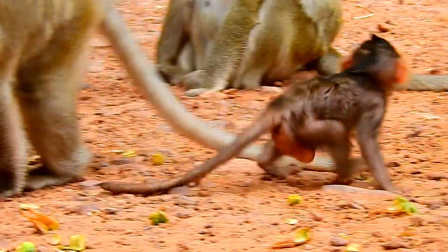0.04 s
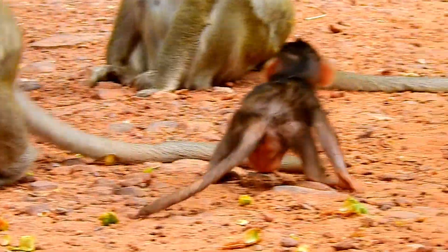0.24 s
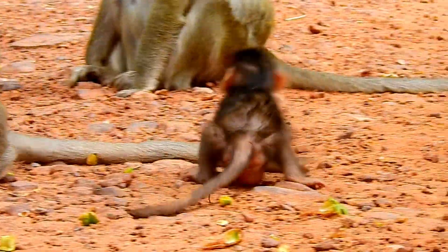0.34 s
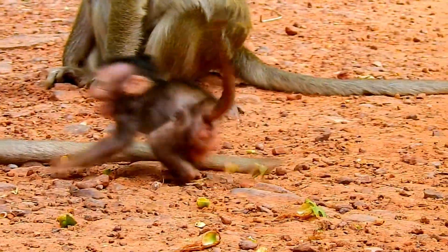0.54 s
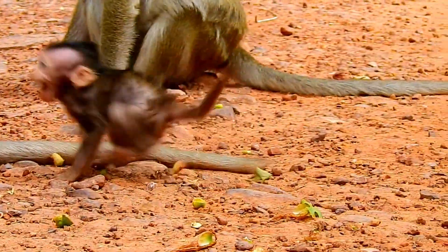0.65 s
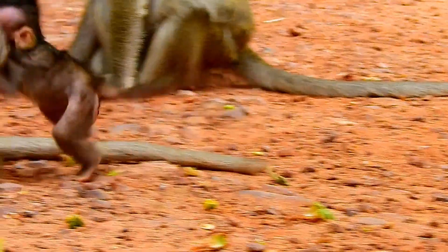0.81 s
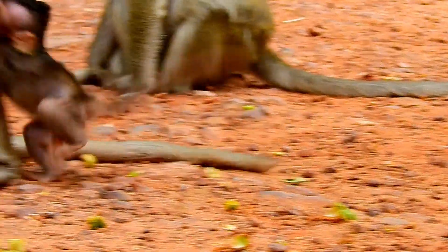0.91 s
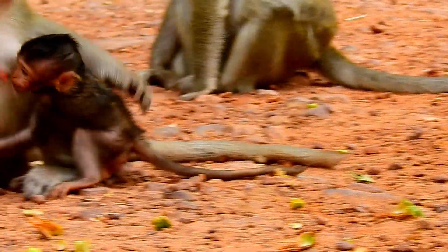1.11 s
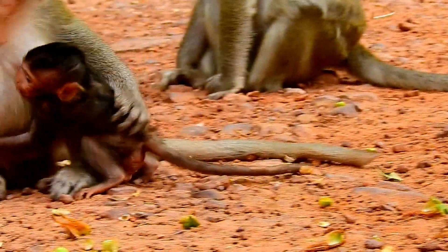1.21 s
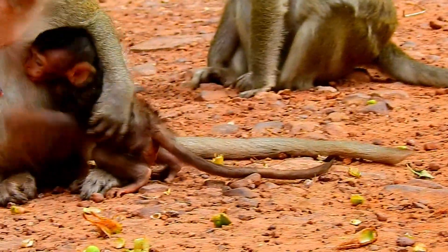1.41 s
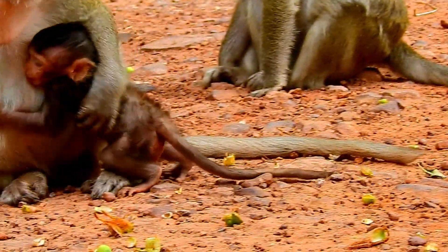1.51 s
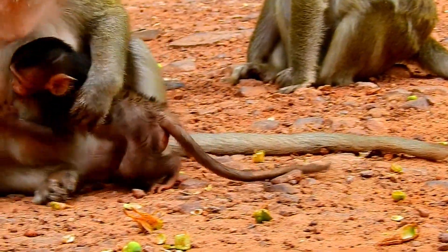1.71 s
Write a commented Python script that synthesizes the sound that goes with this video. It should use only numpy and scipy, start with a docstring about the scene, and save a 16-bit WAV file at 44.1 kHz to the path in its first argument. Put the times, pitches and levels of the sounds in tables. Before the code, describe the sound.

A baby monkey cries outdoors. An earlier cry's echo fades at the start, then a hoarse, ragged cry runs from about 0.2 to 0.5 seconds. A very high squeal follows, rising, breaking into a screech, clearing and falling by 0.9 seconds, with a brief echo near 1.1 seconds. Soft scuffs on grit come after, over a faint hiss and a barely audible distant idling engine.

```python
"""Baby monkey crying

A baby monkey runs over gritty ground to an adult. One hoarse cry flips between clear tone and ragged
throat pulses; a very high squeal rises, breaks into a screech, clears and falls, and its end returns
as a brief high echo. The surroundings echo both calls; an earlier cry's echo dies away at the start.
Grit scuffs softly over a faint high hiss and a far idling engine. A faint far call enters at the end."""
import sys
import numpy as np
from scipy import signal
from scipy.fft import rfft, irfft
from scipy.io import wavfile
from scipy.ndimage import uniform_filter1d, map_coordinates

SR = 44100
rng = np.random.default_rng(int(sys.argv[2]) if len(sys.argv) > 2 else 0)


def log_audio(samples):
    """Write samples as a 16-bit WAV file to the path given in sys.argv[1]."""
    # one column per channel
    frames = np.atleast_2d(samples).T
    # limit to full scale, then quantise
    limited = np.clip(frames, -1, 1)
    pcm = np.round(limited * 32767).astype(np.int16)
    wavfile.write(sys.argv[1], SR, pcm)


N = 77175

# diffuse stereo width: freq_hz, side_db
SPREAD = [(100, -31.5), (900, -16.5), (5000, -9), (10000, 3)]
# background spectra: freq_hz, gain_db
ENGINE_COLOUR = [(25, -32.5), (65, -10.5), (110, -7.5), (190, 1.5), (290, -10), (350, -10.5), (420, -21),
                 (1500, -66.5)]
HISS_COLOUR = [(1500, -52), (3200, -14), (4500, -26.5), (5400, -2.5), (6500, 6), (9000, -29), (15000, -74)]
AIR_COLOUR = [(20, -29.5), (70, -3), (200, -4.5), (1200, -19), (8000, -28.5), (15000, -49.5)]
EARLIER_CRY_COLOUR = [(120, -56.5), (748, -18.5), (967, 2), (1600, -14), (2850, -17.5), (3440, -12.5),
                      (5840, -39), (16000, -85)]
# high hiss: time_s, level_db
HISS_LEVEL = [(0, -68), (1.24, -69.5), (1.62, -72), (1.63, -60.5), (1.75, -58.5)]
# noise bursts: start_s, decay_s, level_db, centre_hz, half_width_oct
# the row at 1.096 s is a brief high echo of the squeal's end; the others are scuffs
NOISE_BURSTS = [(0.067, 0.0036, -52, 7140, 0.095), (0.092, 0.092, -57, 6360, 0.15),
                (1.096, 0.041, -51.5, 6230, 0.092), (1.192, 0.0046, -70, 2983, 0.26),
                (1.254, 0.083, -63, 5960, .12), (1.252, 0.099, -67, 3710, 0.18),
                (1.35, 0.067, -71, 3950, 0.23), (1.553, 0.024, -65.5, 7140, 0.089),
                (1.616, 0.0037, -69.5, 2616, 0.36), (1.627, 0.0062, -50.5, 5830, 0.13)]

# hoarse cry: time_s, pitch_hz, level_db, roughness
CRY = [(.18, 502.8, -43.5, 0.94), (.191, 431, -32, 1), (.208, 394.4, -17.5, 0.31),
       (.221, 391.5, -19.5, 0.1), (.225, 475.5, -25, 0.65), (.231, 510.7, -15.5, 0.6),
       (.255, 563.3, -20, .6), (.27, 532.4, -20.5, 1), (.336, 519.7, -22, 0.7), (.349, 517.5, -17.5, 0.42),
       (.366, 550, -15.5, 0.54), (.371, 538.7, -23, .7), (.378, 537.3, -15.5, 0.5), (.395, 519.7, -17, .2),
       (.412, 573.2, -16.5, 0.6), (.424, 503.3, -16, 0.21), (.44, 497.8, -17.5, 0.71),
       (.478, 495.4, -28, 0.57), (.488, 552.3, -27, 0.22), (.508, 535.3, -39.5, 1), (.53, 579, -31.5, 0.5),
       (.59, 553.6, -43, .6)]
# clear voice: harmonic, gain_db
CRY_HARMONICS = [(2, 4), (3, -25), (4, -25)]
# throat response to ragged pulses: freq_hz, gain_db
THROAT_COLOUR = [(100, -66), (400, -39), (575, -27.5), (670, -17), (800, 1), (1070, -2.5), (1300, -5),
                 (1560, -21.5), (2000, -23.5), (2350, -22.5), (2650, -26.5), (3500, -30), (9000, -65)]
# low tone held through the roughness: time_s, pitch_hz, level_db
HUM = [(.226, 532, -40.5), (.26, 591, -36.5), (.32, 541, -44.5), (.412, 609, -41.5), (.43, 562, -48)]
# two overtones held by the throat: time_s, lower_db, upper_db
OVERTONES = [(.22, -52, -46), (.25, -41.5, -39.5), (.29, -31.5, -46), (.35, -38.5, -46.5),
             (.38, -42.5, -38), (.44, -30, -46.5)]
# rasping air, sliding mouth resonances: time_s, level_db, upper_hz, lower_hz
RASP = [(.222, -55.5, 6860, 5823), (.233, -38, 6760, 5770), (.27, -31.5, 6856, 4928),
        (.37, -38, 5733, 4610), (.44, -38.5, 5960, 4466), (.57, -51, 5853, 4470)]
# rasp spectrum: freq_hz, gain_db
RASP_COLOUR = [(1500, -11), (3600, -5), (4600, 1.5), (5600, -1.5), (6900, -0.5), (9000, -17), (11500, -37),
               (15000, -47)]

# squeal: time_s, pitch_hz, fundamental_db, octave_db
SQUEAL = [(.532, 4083, -82, -38.5), (.544, 4886, -77, -27), (.566, 4790, -72, -28.5),
          (.578, 5012, -74, -30.5), (.602, 5110, -56, -29.5), (.618, 5575, -64, -39.5),
          (.66, 5256, -75, -43.5), (.687, 5104, -71, -35.5), (.755, 5277, -45, -52),
          (.774, 5223, -38.5, -30.5), (.808, 5188, -33, -34.5), (.83, 5157, -36.5, -33.5),
          (.852, 4990, -29.5, -30), (.878, 4680, -35, -35.5), (.889, 4606, -28, -27.5),
          (.904, 4360, -33.5, -24.5), (.915, 3968, -52.5, -34), (.927, 3572, -67, -27)]
# flutter on its fundamental: time_s, share
FRAY = [(.8, 0.8), (.89, 0.24)]
# third harmonic in the final dive: time_s, re_octave_db
THIRD_HARMONIC = [(.88, -30), (.9, -25), (.917, -5)]
# chaotic part of the squeal: time_s, level_db
SCREECH_LEVEL = [(.56, -49.5), (.6, -35), (.642, -28), (.662, -33), (.684, -27), (.714, -33.5), (.73, -26),
                 (.753, -26.5), (.758, -40), (.8, -47), (.875, -42), (.9, -31), (.917, -35.5), (.932, -47)]
# its smeared partials: pitch_ratio, width_hz, gain_db
SCREECH_PARTIALS = [(1.001, 379, -20.5), (1.248, 447.2, -10.5), (1.462, 388.6, -7), (1.9, 520, -17)]
# mouth response to the screech: freq_hz, gain_db
MOUTH_COLOUR = [(1500, -41.5), (3000, -27), (3900, -6), (4700, 8), (11000, 7), (12200, -6), (13900, -9.5),
                (15500, -17)]

# phase between microphone ports: freq_hz, left_lead_rad
PORT_PHASE = [(900, -.04), (3000, 0), (6000, .35), (10000, -0.58), (14000, -0.29)]
# phase ripple from near reflections: freq_hz, rms_rad
NEAR_TWIST = [(800, .05), (5000, 0.66), (12000, 0.8)]
# reverberation spectrum: freq_hz, gain_db
REVERB_COLOUR = [(250, -12), (1000, -20.5), (1450, 4.5), (3500, 3), (4600, -9.5), (8000, -6), (10500, -23),
                 (15000, -12)]


def undb(db):
    """Decibels to gain."""
    return 10 ** (np.asarray(db) / 20)


def unit(x):
    """Scale to rms 1."""
    return x / np.sqrt(np.mean(x ** 2))


def clock():
    """Sample times in seconds."""
    return np.arange(N) / SR


def phase_of(hz):
    """Running phase in radians."""
    return 2 * np.pi * np.cumsum(hz) / SR


def curve(table, column=1):
    """One column, linear in time."""
    rows = np.array(table)
    return np.interp(clock(), rows[:, 0], rows[:, column])


def envelope(table, column=1):
    """A dB column as a gain that closes quickly outside the table."""
    outside_s = np.maximum(table[0][0] - clock(), 0) + np.maximum(clock() - table[-1][0], 0)
    return undb(curve(table, column)) * np.exp(-outside_s / 0.0025)


def on_bins(points):
    """(freq_hz, value) points on the bins of a double-length FFT."""
    hz, value = np.array(points).T
    return np.interp(np.log(np.arange(N + 1) * SR / (2 * N) + 1), np.log(hz), value)


def colour(x, points):
    """Filter by (freq_hz, gain_db) points."""
    return irfft(rfft(x, 2 * N) * undb(on_bins(points)))[..., :N]


def noise():
    """White noise."""
    return rng.standard_normal(N)


def walk(hz):
    """Smooth random drift, rms 1, up to about hz."""
    bins_hz = np.arange(N // 2 + 1) * SR / N
    return unit(irfft(rfft(noise()) * np.exp(-.5 * (bins_hz / hz) ** 2), N))


def wide_noise():
    """Diffuse stereo noise, alike in the bass."""
    return noise() + colour(noise(), SPREAD) * np.array([[1], [-1]])


def smeared(phase, width_hz):
    """A partial blurred into a noise band."""
    return (walk(width_hz) * np.sin(phase) + walk(width_hz) * np.cos(phase)) / np.sqrt(2)


def engine(rate_hz=21.8, beat_at_s=1.495, decay_s=0.03, level_db=-72):
    """A far engine idles: nearly identical decaying noise beats."""
    age_s = ((clock() - beat_at_s) * rate_hz % 1) / rate_hz
    beats = np.resize(noise()[:int(SR / rate_hz)], N) + .3 * noise()
    return unit(colour(beats * np.exp(-age_s / decay_s), ENGINE_COLOUR)) * undb(level_db)


def hiss(flicker_db=1.2):
    """Faint high hiss, stepping up near the end."""
    return unit(colour(wide_noise(), HISS_COLOUR)) * undb(curve(HISS_LEVEL) + flicker_db * walk(40))


def still_air(level_db=-76.5):
    """Steady low noise of the air."""
    return undb(level_db) * unit(colour(wide_noise(), AIR_COLOUR))


def earlier_echo(start_db=-30.5, fall_db_per_s=72):
    """The reverberation of an earlier cry dies away."""
    return unit(colour(wide_noise(), EARLIER_CRY_COLOUR)) * undb(start_db - fall_db_per_s * clock())


def scuffs_and_squeal_echo(attack_share=0.18, grain_db=1):
    """Short noise bands: soft scuffs, and one brief high echo of the squeal's end."""
    grain = wide_noise() * undb(grain_db * walk(300))
    out = 0
    for start_s, decay_s, level_db, centre_hz, half_width_oct in NOISE_BURSTS:
        age_s = np.maximum(clock() - start_s, 0)
        band = [(centre_hz * 2 ** (k * half_width_oct), -2.5 * abs(k) ** 1.6) for k in range(-7, 8)]
        shape = np.minimum(age_s / (attack_share * decay_s), 1) * np.exp(-age_s / decay_s)
        out = out + undb(level_db) * unit(colour(grain, band)) * shape
    return out


def cry(waver=0.0093, jitter=.13, shimmer_db=1.5):
    """The voice flips between clear tone and ragged throat pulses, with hum, overtones and rasp."""
    pitch_hz = curve(CRY)
    phase = phase_of(pitch_hz * (1 + waver * walk(190)))
    clear = unit(sum(undb(db) * np.sin(k * phase) for k, db in CRY_HARMONICS))
    hum = unit(np.sin(phase_of(curve(HUM)))) * envelope(HUM, 2)
    overtones = throat_overtones()
    cycles = np.cumsum(pitch_hz * (1 + jitter * walk(200))) / SR
    shimmer = undb(shimmer_db * walk(180))
    pulses = np.diff(np.floor(cycles), prepend=0) * shimmer
    hoarse = unit(colour(pulses, THROAT_COLOUR))
    hoarse /= np.sqrt(uniform_filter1d(hoarse ** 2, SR // 60) + 1e-6)  # even out the level
    rough = np.clip(curve(CRY, 3), 0, 1)
    voice = (np.sqrt(1 - rough ** 2) * clear + rough * hoarse) * envelope(CRY, 2)
    puffs = shimmer * np.exp(-(cycles % 1))
    return voice + hum + overtones * shimmer + rasp(puffs)


def throat_overtones(rings_hz=(1556, 2179), waver=.028):
    """Two overtones held by the throat ring through the roughness."""
    drift = 1 + waver * walk(70)
    return sum(unit(np.sin(phase_of(hz * drift))) * envelope(OVERTONES, column)
               for column, hz in enumerate(rings_hz, 1))


def rasp(puffs, ring_db=-8, ring_width_hz=170):
    """Air puffs with each throat pulse and rings two sliding mouth resonances."""
    rings = unit(sum(smeared(phase_of(curve(RASP, column)), ring_width_hz) for column in (2, 3)))
    breath = (noise() + undb(ring_db) * rings) * puffs
    return unit(colour(breath, RASP_COLOUR)) * envelope(RASP)


def squeal(waver=.0085, shimmer_db=2.5, fray_width_hz=227.7):
    """A fluttering whistle with a strong octave; it screeches, then its fundamental clears."""
    phase = phase_of(curve(SQUEAL) * (1 + waver * walk(440)))
    fundamental_gain, octave_gain = envelope(SQUEAL, 2), envelope(SQUEAL, 3)
    fray = np.clip(curve(FRAY), 0, 1)
    fundamental = np.sqrt(1 - fray ** 2) * np.sin(phase) + fray * smeared(phase, fray_width_hz)
    upper = np.sin(2 * phase) + envelope(THIRD_HARMONIC) * np.sin(3 * phase)
    whistle = np.sqrt(2) * (fundamental_gain * fundamental + octave_gain * upper)
    whistle *= undb(shimmer_db * walk(120))
    return whistle + screech(phase) + octave_gain * sideband(2 * phase)


def sideband(octave_phase, above_hz=3950, width_hz=170, gain_db=-32):
    """A thin partial arches above the squeal's octave."""
    return unit(smeared(octave_phase + 2 * np.pi * above_hz * clock(), width_hz)) * undb(gain_db)


def screech(phase, breath_db=-6, flutter_db=2):
    """Under strain the squeal turns chaotic: smeared partials near and between its harmonics."""
    partials = sum(undb(db) * smeared(ratio * phase, hz) for ratio, hz, db in SCREECH_PARTIALS)
    chaos = (partials + undb(breath_db) * noise()) * undb(flutter_db * walk(300))
    return unit(colour(chaos, MOUTH_COLOUR)) * envelope(SCREECH_LEVEL)


def far_call(start_s=1.664, rise_s=0.064, pitch_hz=1250, waver=0.016, peak_db=-78):
    """A faint wavering coo fades in."""
    tone = np.sin(phase_of(pitch_hz * (1 + waver * walk(40))))
    return undb(peak_db) * tone * np.clip((clock() - start_s) / rise_s, 0, 1)


def microphone_ports(x, near_decay_s=0.0034):
    """Near reflections twist the treble's phase between two close ports."""
    reflections = noise() * np.exp(-clock() / near_decay_s)
    ripple = unit(rfft(reflections, 2 * N).real)
    lead_rad = on_bins(PORT_PHASE) + on_bins(NEAR_TWIST) * ripple
    return irfft(rfft(x, 2 * N) * np.exp(.5j * lead_rad * np.array([[1], [-1]])))[:, :N]


def surroundings(x):
    """A diffuse tail, shorter in the treble, with one late echo; a wavering delay blurs high tones."""
    build_s, low_early_t60_s, treble_early_t60_s = 0.014, 0.72, 0.43
    echo_s, echo_db, echo_decay_s = 0.21, -26, 0.016
    extra_fall_db_per_s, smear_s, smear_hz = 24, 5e-5, 130
    t, scatter = clock(), wide_noise()
    low = colour(scatter, [(2800, 0), (3600, -10), (4500, -40)])
    tail = low * undb(-60 * t / low_early_t60_s) + (scatter - low) * undb(-60 * t / treble_early_t60_s)
    tail *= undb(-extra_fall_db_per_s * np.maximum(t - echo_s, 0))
    tail *= 1 - np.exp(-t / build_s)
    echo = scatter * (t > echo_s) * np.exp(-abs(t - echo_s) / echo_decay_s) * undb(echo_db)
    response = colour(unit(tail + echo), REVERB_COLOUR) / np.sqrt(N)
    blurred = map_coordinates(x, [(t + smear_s * walk(smear_hz)) * SR], mode="mirror")
    return signal.fftconvolve(blurred[None], response, axes=1)[:, :N]


def scene():
    """The calls and their echoes, over scuffs and background."""
    calls = cry() + squeal()
    monkey = microphone_ports(calls) + surroundings(calls) + earlier_echo() + scuffs_and_squeal_echo()
    return monkey + engine() + hiss() + far_call() + still_air()


def record(dry):
    """Steep treble cut."""
    cutoff_hz = 15700
    return signal.sosfilt(signal.ellip(10, .2, 80, cutoff_hz, fs=SR, output="sos"), dry)


dry = scene()
out = record(dry)
log_audio(out)
```